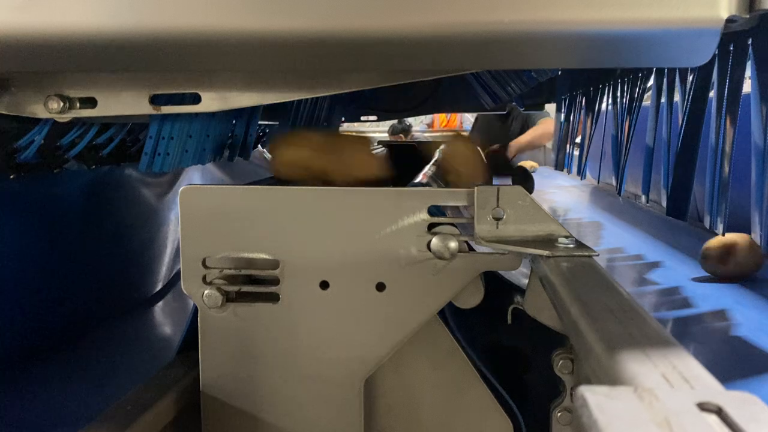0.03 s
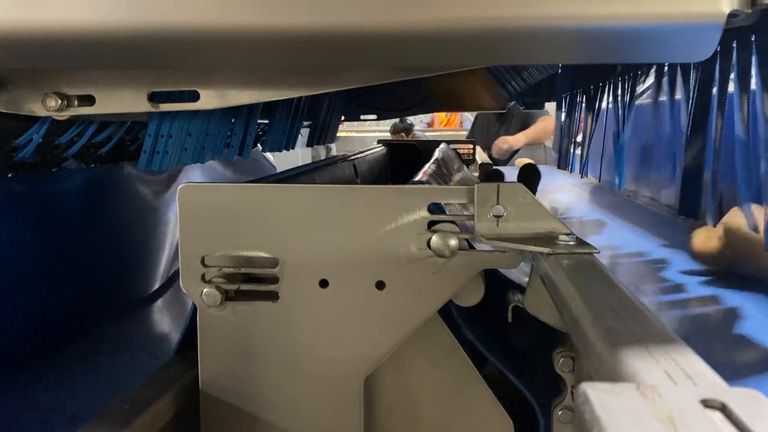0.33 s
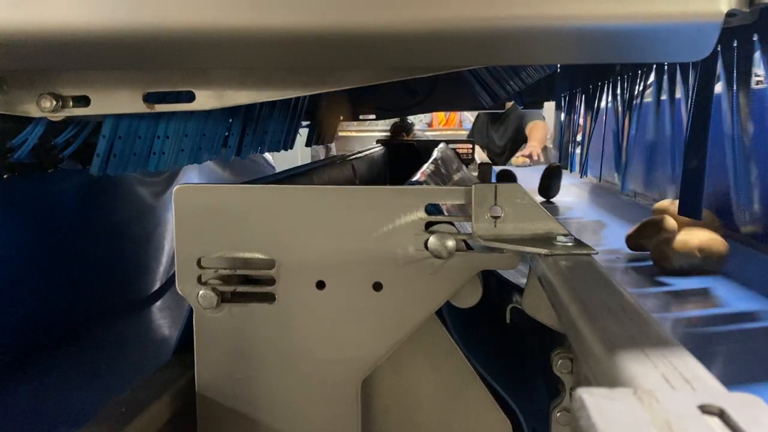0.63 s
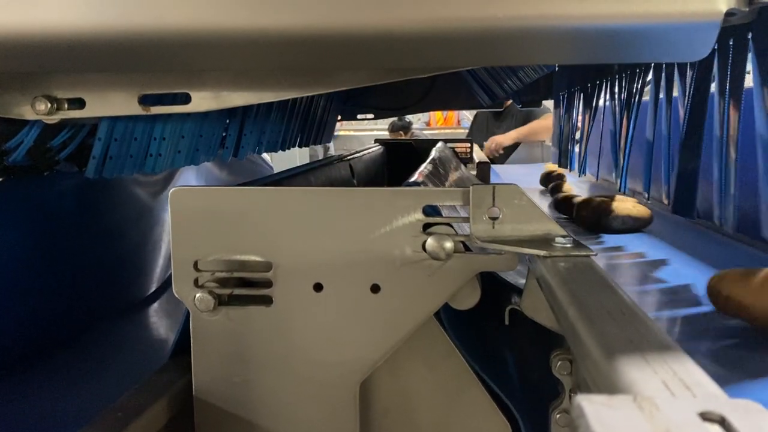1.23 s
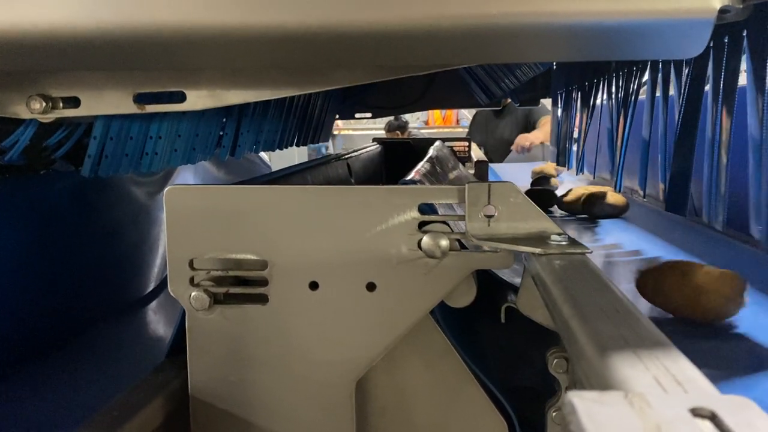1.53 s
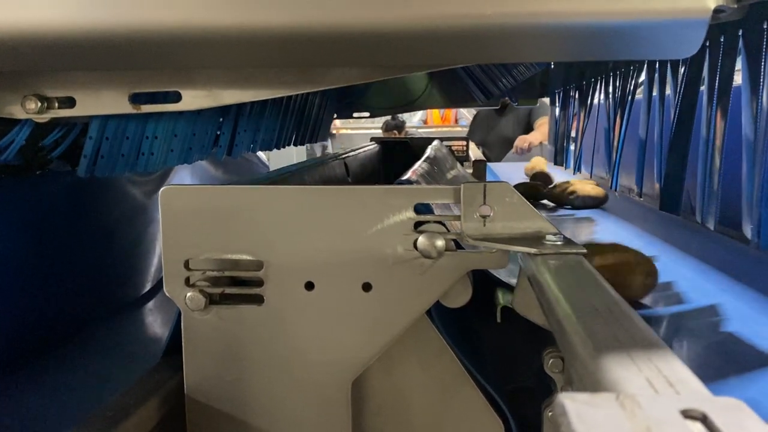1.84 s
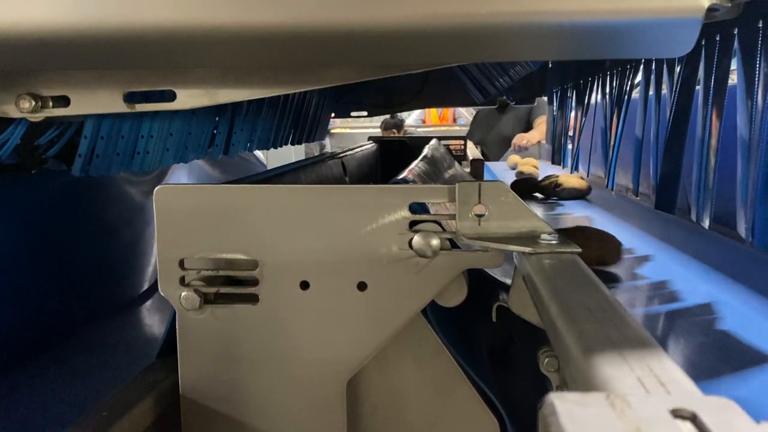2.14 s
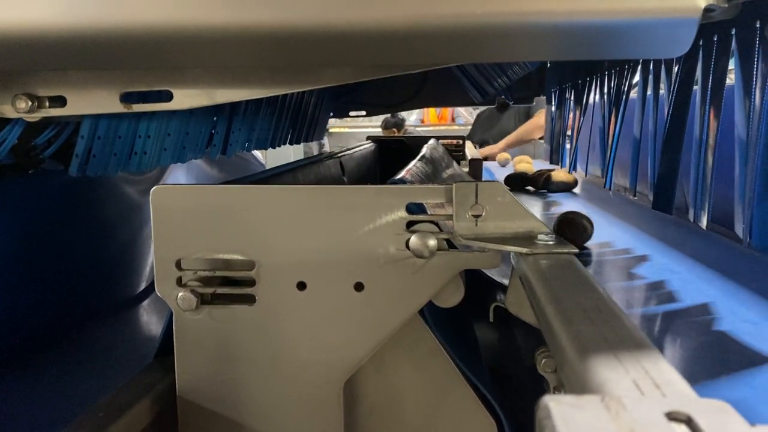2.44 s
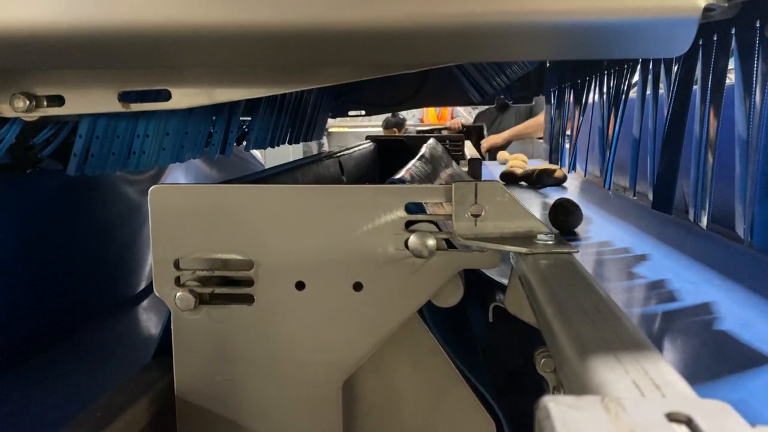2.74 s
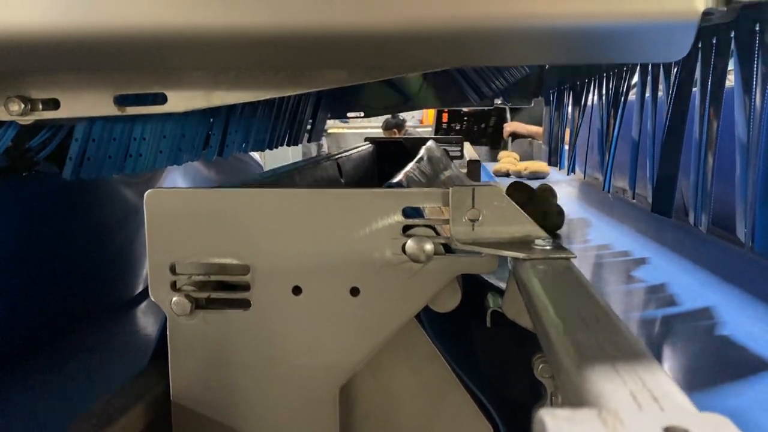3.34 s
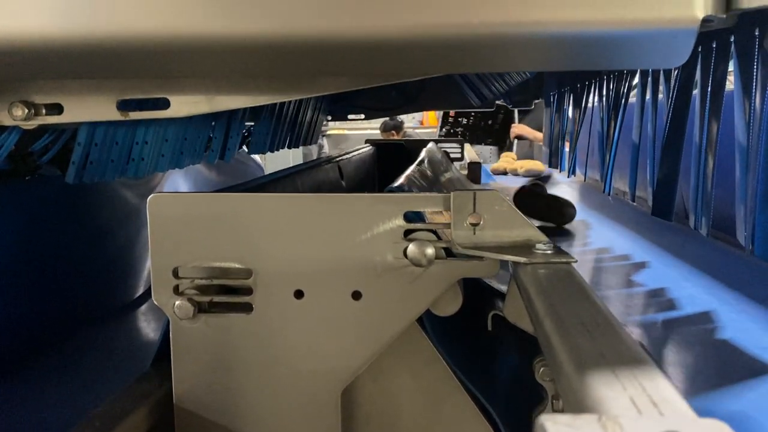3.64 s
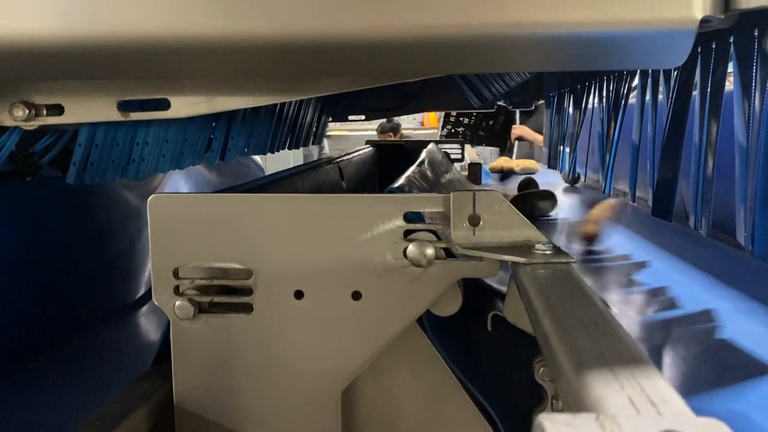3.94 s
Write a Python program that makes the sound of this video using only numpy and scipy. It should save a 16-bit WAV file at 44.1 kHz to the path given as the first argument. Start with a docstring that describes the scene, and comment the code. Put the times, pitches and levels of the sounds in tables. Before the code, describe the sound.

A potato sorting machine runs with a steady low roar, rattle and belt hiss, heard close up inside a plant. Potatoes clatter against steel guides, the belt scrapes and squeaks, then more potatoes drop in.

```python
"""Inside a running potato sorter, close to its steel frame. The sound cuts in just after the start:
conveyors and rollers roar, thud and rattle, the belt hisses and the drives hum faintly throughout.
For the first second potatoes clatter against the metal guides, with two thin squeaks. From about
1.7 s the belt scrapes, groans, drums and squeaks. From 2.8 s to the end more potatoes drop in."""
import sys
import numpy as np
from scipy import signal
from scipy.fft import rfft, irfft
from scipy.io import wavfile
from scipy.ndimage import map_coordinates

SR = 44100
rng = np.random.default_rng(int(sys.argv[2]) if len(sys.argv) > 2 else 0)


def materialize(psi):
    """Save the field psi as 16-bit PCM at rate SR to the path in sys.argv[1].

    A 1-D psi becomes a single channel; in a 2-D psi each row is a channel.
    """
    bounded = np.clip(np.atleast_2d(psi).T, -1, 1)
    quanta = np.round(bounded * 32767).astype(np.int16)
    wavfile.write(sys.argv[1], SR, quanta)


N = 176400  # 4 seconds

# Potatoes hitting the guides: start_s, thump_db, clang_db, crack_db, ring_db, brightness_hz
POTATO_HITS = [(.109, -6, 2, -0.5, 4, 1900), (0.117, -12, -14, -13, -2, 6400),
               (.155, 7, -5.5, -8, -1.5, 1200), (.192, -11, -23, -29, -11, 1500),
               (.240, -20, -26, -21, -12, 4500), (.285, -21, -14, -7, -14, 4000),
               (.392, -17, -22, -12.5, -12, 4000), (0.489, 1.5, -9, -8.5, -14, 5000),
               (.503, 7, -5, -7.5, -1.5, 2300), (.511, 1, -12, -17, -1, 850),
               (.526, -7, -15, -21, -6.5, 2200), (.543, -1.5, -8.5, -11, -8, 2200),
               (.600, -8, -27, -18, -22, 2500), (.641, -6, -8.5, -10.5, -13, 6000),
               (.655, -1, -13, -24, -5, 900), (.880, -4, -20, -4, -1, 3700),
               (.897, -4, -11, -16, -11, 1700), (.935, -2, -10, -16, -11, 3400),
               (.957, -7, -22, -26, -15, 3100), (2.782, -8, -9, -7, -9, 7400),
               (3.173, 2, -10, -11, -9, 2200), (3.221, -4, -14, -19, -2.5, 1900),
               (3.451, -13, -20, -17, -12, 2500), (3.553, -19, -5.5, -3, -2, 3000),
               (3.563, -7, -16, -17, -2, 5200), (3.592, -21, -14, -20, -3, 2400),
               (3.601, -18, -17, -18, 1, 2800), (3.725, -17, -11, -10, -12, 3500),
               (3.769, 2, -23, -26, -18, 1200), (3.937, -5, -6.5, -5.5, -0.5, 2200),
               (3.979, -10, -11, -9, -2, 2300)]


def rollers(t):
    """Conveyors and rollers make a low roar of tumbling thuds, and a rattle that follows the load."""
    # Tone of the roar and of the rattle: pitch_hz, level_db_per_hz
    roar_tone = [(20, -78), (35, -67), (55, -49), (100, -43.5), (165, -42), (300, -45.5), (440, -50),
                 (650, -53), (950, -59.5), (2000, -70.5), (5000, -69), (16000, -100)]
    rattle_tone = [(300, -78), (700, -63.5), (1100, -60.5), (2000, -62.5), (2900, -67), (4700, -71),
                   (6200, -76.5), (8000, -91), (16000, -125)]
    # Strength of the roar, and of the rattle as the load passes: time_s, level_db
    surge = [(.1, 0.5), (.55, 1), (.8, 0), (1.2, 1.5), (1.5, -0.5), (1.85, 1.5), (2.15, 0), (2.7, -0.5),
             (3.15, 1), (3.45, 1), (3.75, 0.5), (4, 2)]
    load = [(.1, 3.5), (.4, 0), (.78, 0), (.97, 2.5), (1.1, 1), (1.5, 0.9), (1.8, -0.1), (2.12, 1),
            (2.35, 2.3), (2.65, 0.5), (3, 1), (3.3, -1), (3.6, 1.5), (4, 1)]
    thud_share, roller_hz = 0.3, 21.87
    rush = np.sqrt(1 - thud_share) * rng.standard_normal((2, N))
    thuds = np.sqrt(thud_share) * tiny_hits(per_s=420, spread_db=3.5, fade_s=0.036)
    throb_db = -0.3 * np.sin(2 * np.pi * roller_hz * t + drift(1.67))
    flutter_db = 0.5 * drift(70) + 0.16 * drift(4.07)
    roar = colour(rush + thuds, roar_tone) * gain(throb_db + flutter_db + over_time(t, surge))
    rattle = colour(tiny_hits(per_s=900, spread_db=1, fade_s=0.06), rattle_tone)
    return roar + steel_panels(rattle, strength=1.3) * gain(over_time(t, load))


def potatoes(t):
    """Each potato thumps the chute, clangs the sheet steel and cracks; the hall rings on."""
    # Tone of the three parts of a hit: pitch_hz, level_db_per_hz
    thump = [(50, -58), (150, -46), (290, -42.5), (550, -50), (850, -48), (1300, -59.5), (3000, -104)]
    clang = [(200, -54), (700, -45.5), (1700, -48), (3000, -56.5), (5000, -53.5), (9000, -58.5),
             (16000, -81)]
    crack = [(800, -96), (2200, -63), (3600, -47.5), (5500, -57), (7300, -55), (10000, -56), (16000, -67.5)]
    hits, out = np.array(POTATO_HITS), 0
    age = t - hits[:, :1]
    rise = np.clip(age / 0.003, 0, 1) ** 2  # builds up in 3 ms
    hall_power = (gain(-16) * fade(age, 0.55)) ** 2
    for level_db, part, fade_s in zip(hits.T[1:4], (thump, clang, crack), (0.1, 0.14, 0.085)):
        power = gain(level_db) ** 2 @ (rise * (fade(age, fade_s) ** 2 + hall_power))  # adds all hits
        grit = tiny_hits(per_s=4000, spread_db=3.5, fade_s=0.0035)
        out += colour(np.sqrt(power) * grit, part)
    return steel_panels(out, strength=1.6)


def ringing_guides():
    """Each hit ticks and sets the steel guides ringing, most in the notes near its brightness."""
    # The notes of the guides: pitch_hz, level_db, fade_s
    notes = [(660, -29, .1), (824, -28, .12), (1244, -29, .17), (1626, -27, .12), (1776, -28, .16),
             (2062, -31, .2), (2336, -28, .22), (2503, -31, .14), (2885, -32, .14), (3128, -32, .12),
             (3321, -31, .09), (3731, -31, .08), (4430, -30, .14), (6400, -31, .11), (7130, -29, .17),
             (7504, -32, .18)]
    pitch_hz, level_db, fade_s = np.array(notes).T[:, :, None]
    reach_octaves, scatter_db, detune = 0.7, 2, 0.004
    out = np.zeros((2, N + SR))
    age = np.arange(SR // 4) / SR
    for start_s, *_, ring_db, brightness_hz in POTATO_HITS:
        level_chance, pitch_chance = rng.standard_normal((2, len(notes), 1))
        nearness = np.exp(-0.5 * (np.log2(pitch_hz / brightness_hz) / reach_octaves) ** 2)
        strength = gain(level_db + scatter_db * level_chance) * nearness
        cycles = pitch_hz * (1 + detune * pitch_chance) * age + rng.random((2, len(notes), 1))
        ring = np.sqrt(2) * (strength * fade(age, fade_s) * np.sin(2 * np.pi * cycles)).sum(axis=1)
        tick = keep_band(rng.standard_normal((2, len(age))), 0.7 * brightness_hz, 1.3 * brightness_hz)
        hit = ring + tick * gain(-17.5) * fade(age, 0.03)
        rise = np.minimum(age / 0.0015, 1)
        start = int(start_s * SR)
        out[:, start:start + len(age)] += gain(ring_db) * hit * rise
    return out[:, :N]


def belt_hiss(t):
    """The belt rubs on its guides: a gritty hiss that swells as it rubs harder."""
    # Tone of the hiss: pitch_hz, level_db_per_hz
    hiss_tone = [(1000, -92), (3500, -73), (6000, -77), (7100, -74), (8300, -74), (11000, -77),
                 (14000, -79.5), (16000, -83)]
    # How hard the belt rubs: time_s, level_db
    rubbing = [(.1, 5), (.42, -5.5), (.75, 0), (1.05, -3), (1.55, -3.5), (1.68, 2), (1.8, 1), (1.95, -2.5),
               (2.12, -7.5), (2.28, -0.5), (2.42, -4.5), (2.53, -3.5), (2.7, -3.5), (2.78, 5), (2.87, -1.5),
               (2.99, 6), (3.1, -3), (3.18, 5), (3.3, -7.5), (3.39, 1), (3.48, -3), (3.72, 1), (3.85, -1.5)]
    hiss = colour(tiny_hits(per_s=3000, spread_db=1, fade_s=0.02), hiss_tone)
    return steel_panels(hiss, strength=0.33) * gain(over_time(t, rubbing) + 0.41 * drift(27.65))


def belt_scrapes(t):
    """The belt drags now and then, making a short gritty scrape or a low drumming."""
    # Each drag: middle_s, length_s, pitch_hz, width_hz, level_db
    drags = [(1.73, .28, 6600, 700, -39), (1.74, 0.22, 12200, 1300, -42), (2.278, 0.22, 54, 22, -26.5),
             (2.68, 0.27, 583, 150, -32), (2.8, 0.43, 1050, 480, -37.5), (2.968, .15, 3430, 900, -33)]
    out = 0
    for middle_s, length_s, pitch_hz, width_hz, level_db in drags:
        grit = tiny_hits(per_s=1500, spread_db=1.5, fade_s=0.02)
        scrape = keep_band(grit, pitch_hz - width_hz / 2, pitch_hz + width_hz / 2)
        out += scrape * gain(level_db) * swell(t, middle_s, length_s)
    return out


def belt_squeaks(t):
    """The belt gives brief squeaks and a low groan; the higher ones are rougher."""
    # Each squeak or groan: middle_s, length_s, pitch_hz, level_db
    squeaks = [(.265, 0.056, 7050, -40), (0.616, 0.06, 6930, -37), (1.89, 0.35, 174, -26),
               (2.474, 0.18, 1491, -29.5), (3.35, .035, 7050, -33)]
    out = 0
    for middle_s, length_s, pitch_hz, level_db in squeaks:
        squeak = wobbly_tone(pitch_hz, wobble=0.016 * pitch_hz / 7000, per_s=400)
        out += squeak * gain(level_db) * swell(t, middle_s, length_s)
    return out


def drives():
    """Motors and gears hum and whine faintly, wavering in pitch and level."""
    # Their tones: pitch_hz, level_db
    hums = [(56, -37), (76, -34), (152, -34), (172.3, -39), (709, -39), (1491, -49), (2501, -53),
            (7500, -56)]
    return sum(wobbly_tone(pitch_hz, wobble=0.0025, per_s=12) * gain(level_db + 2.5 * drift(7.03))
               for pitch_hz, level_db in hums)


def steel_panels(sound, strength):
    """The panels boost their own notes in whatever shakes them."""
    # The notes of the panels: pitch_hz, width_hz, boost_db (at strength 1)
    notes = [(577, 14, 2), (820, 40, 2), (1230, 40, 1.5), (1490, 50, 1.5), (1730, 70, 1.5), (1990, 60, 2.3),
             (2230, 70, 3), (2490, 50, 2.5), (3120, 70, 3), (4250, 80, 1.5), (5100, 50, 3),
             (5240, 110, 2.6), (6880, 60, 2.5), (7090, 110, 2.5), (7300, 60, 2)]
    hz = np.arange(N // 2 + 1) * SR / N
    boost = sum(boost_db / (1 + 2j * (hz - pitch_hz) / width_hz) for pitch_hz, width_hz, boost_db in notes)
    return irfft(rfft(sound) * gain(strength * boost), N)


def microphone(sound):
    """Two openings hear the bass alike and the middle differently; the top reaches the left first."""
    # How alike the two sides are: pitch_hz, likeness (0 to 1)
    likeness = [(60, 0.92), (160, 0.97), (280, 0.8), (450, 0.39), (750, 0.017), (1500, 0.0067),
                (2300, 0.36), (4200, 0.64), (5400, 0.14), (7000, 1), (16000, 1)]
    # How much louder the left is: pitch_hz, level_db
    left_louder = [(60, -1), (300, -1.5), (1000, 0), (2000, -0.5), (2700, 3), (4500, 2.5), (7000, 0)]
    # How far ahead the left is: pitch_hz, lead_radians
    left_ahead = [(30, .02), (380, .35), (1900, .1), (2800, -.5), (4200, -.1), (6300, -.4), (7100, .1),
                  (9100, 3.1), (11200, 6.3), (13300, 9.4), (15500, 12.6)]
    shared, apart = rfft(sound)
    alike = over_pitch(likeness)
    sides = np.array([[1], [-1]])  # left, right
    both = shared * np.sqrt((1 + alike) / 2) + sides * apart * np.sqrt((1 - alike) / 2)
    balance = gain(sides * over_pitch(left_louder) / 2)
    lead = np.exp(1j * sides * over_pitch(left_ahead) / 2)
    return irfft(both * balance * lead, N)


def gain(db):
    """Turns decibels into a number to multiply by."""
    return 10 ** (np.asarray(db) / 20)


def over_time(t, points):
    """Reads a table of (time_s, value) at every moment."""
    return np.interp(t, *np.array(points).T)


def over_pitch(points):
    """Reads a table of (pitch_hz, value) at every pitch."""
    hz, value = np.array(points, float).T
    return np.interp(np.log(np.arange(N // 2 + 1) * SR / N + 1e-9), np.log(hz), value)


def colour(noise, points):
    """Shapes white noise with a table of (pitch_hz, level_db_per_hz)."""
    return irfft(rfft(noise) * gain(over_pitch(points)) * np.sqrt(SR / 2), N)


def keep_band(noise, low_hz, high_hz):
    """Keeps the noise between two pitches and sets its power to 1."""
    band = signal.sosfilt(signal.butter(2, [low_hz, high_hz], "bandpass", fs=SR, output="sos"), noise)
    return band / band.std()


def drift(per_s):
    """Glides through per_s random values a second, each about 1 in size."""
    return map_coordinates(rng.standard_normal(2048), [np.arange(N) / SR * per_s], order=3, mode="wrap")


def fade(age, fade_s):
    """Dies away by 60 dB in fade_s seconds."""
    return np.exp(-np.log(1000) * np.maximum(age, 0) / fade_s)


def swell(t, middle_s, length_s):
    """A smooth rise and fall."""
    return np.exp(-(2 * (t - middle_s) / length_s) ** 2)


def tiny_hits(per_s, spread_db, fade_s):
    """Random small hits of uneven size, each a fading burst of noise; two channels of power 1."""
    hits = (rng.random(N) < per_s / SR) * gain(spread_db * np.minimum(rng.exponential(size=N), np.pi))
    power = np.abs(signal.fftconvolve(hits ** 2, fade(np.arange(N) / SR, fade_s) ** 2)[:N])
    return np.sqrt(power / power.mean()) * rng.standard_normal((2, N))


def wobbly_tone(pitch_hz, wobble, per_s):
    """A two-channel tone of power 1 whose pitch strays by about the fraction wobble."""
    phase = 2 * np.pi * np.cumsum(pitch_hz * (1 + wobble * drift(per_s))) / SR
    return np.sqrt(2) * np.sin(phase + 2 * np.pi * rng.random((2, 1)))


def scene():
    """The whole machine at the microphone."""
    t = np.arange(N) / SR
    running = rollers(t) + belt_hiss(t) + drives() + belt_squeaks(t)
    return microphone(running + potatoes(t) + ringing_guides() + belt_scrapes(t))


def record(dry):
    """The sound cuts in, the tallest peaks are rounded and the highest treble is cut off."""
    start_s, peak, top_hz = 0.084, 0.9, 15700
    switched_on = np.arange(N) / SR >= start_s
    rounded = dry / (1 + (dry / peak) ** 6) ** (1 / 6)
    return signal.sosfilt(signal.ellip(10, 0.2, 90, top_hz, fs=SR, output="sos"), rounded * switched_on)


dry = scene()
out = record(dry)
materialize(out)
```